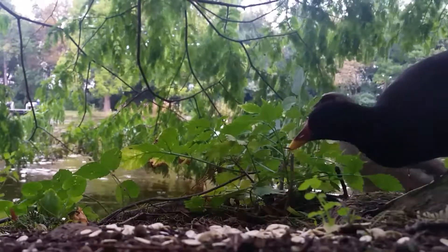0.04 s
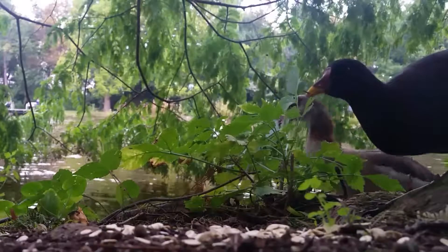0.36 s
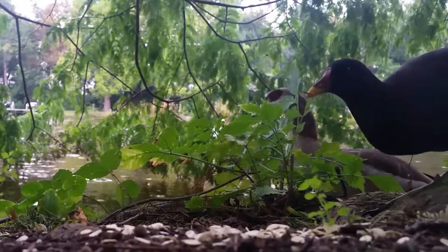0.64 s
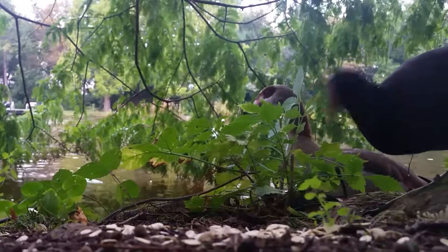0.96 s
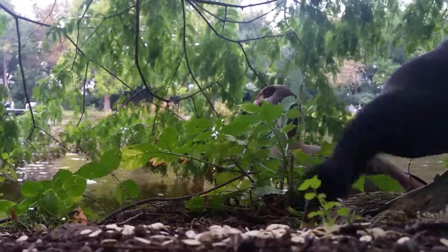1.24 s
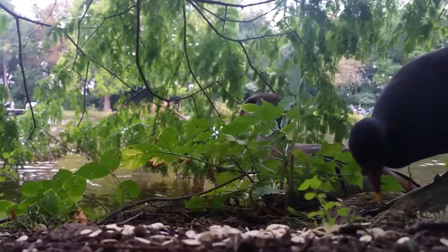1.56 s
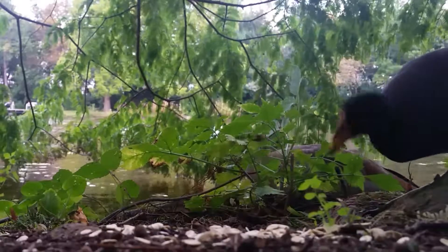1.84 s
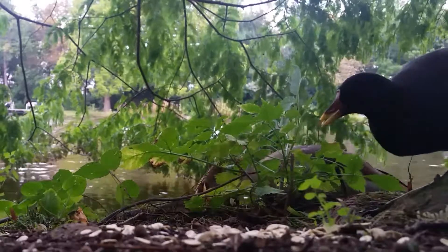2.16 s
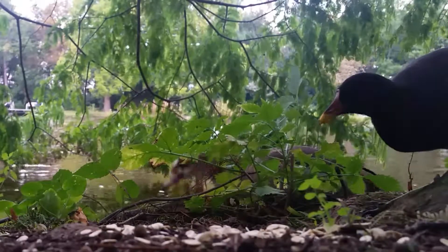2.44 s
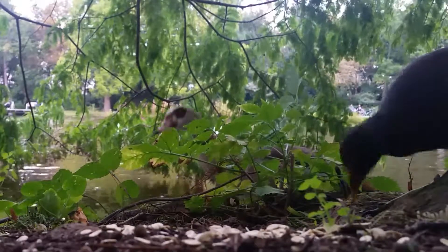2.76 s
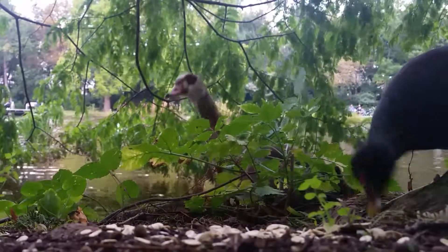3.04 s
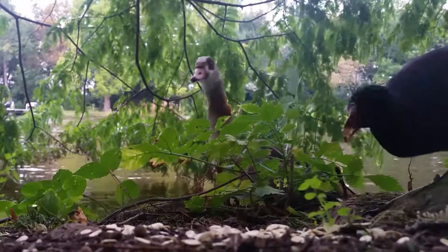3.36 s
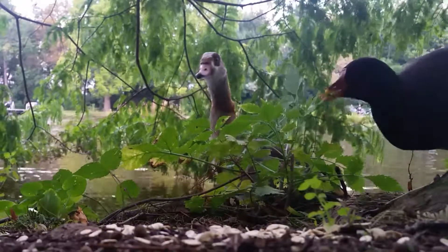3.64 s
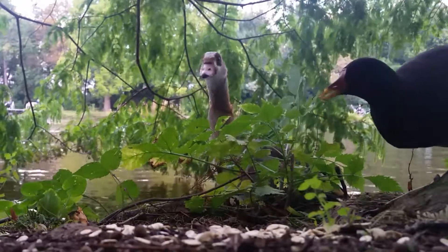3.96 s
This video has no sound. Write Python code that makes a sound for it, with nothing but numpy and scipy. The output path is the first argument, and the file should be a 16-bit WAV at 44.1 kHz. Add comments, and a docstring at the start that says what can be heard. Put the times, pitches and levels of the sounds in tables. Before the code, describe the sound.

A dull rumble of far-off traffic swells slightly, under thin hiss and faint bird chirps.

```python
"""Distant traffic across a park pond

Many far vehicles merge into a dull roar that swells a little, with one engine droning under it.
The roar reaches the left microphone first, and its treble is diffuse. A thin high hiss hangs on
the left, and a small bird chips faintly on the right, its whistles scattered by the trees."""
import sys
import numpy as np
from scipy import signal
from scipy.fft import rfft, irfft
from scipy.io import wavfile

SR = 44100
rng = np.random.default_rng(int(sys.argv[2]) if len(sys.argv) > 2 else 0)


def unload_audio(sound):
    """Save the sound as a 16-bit wav file, at the path given as the first command line argument."""
    columns = np.transpose(np.atleast_2d(sound))
    # keep every value between -1 and 1, then stretch to whole-number steps
    steps = np.round(np.clip(columns, -1, 1) * 32767)
    wavfile.write(sys.argv[1], SR, steps.astype(np.int16))


N = 176400


def undb(db):
    """Amplitude ratio of a level in decibels."""
    return 10 ** (np.asarray(db) / 20)


def over_time(rows):
    """Linear interpolation of (time_s, value) rows at every sample."""
    return np.interp(np.arange(N) / SR, *np.array(rows).T)


def bin_hz():
    """Frequency of every Fourier bin, at least 1 Hz so that its logarithm is finite."""
    return np.maximum(np.fft.rfftfreq(N, 1 / SR), 1)


def over_frequency(rows):
    """Interpolation of (frequency_hz, value, ...) rows at every bin, on a logarithmic axis."""
    hz, *columns = np.array(rows).T
    return np.squeeze([np.interp(np.log(bin_hz()), np.log(hz), column) for column in columns])


def white_spectrum():
    """Spectrum of fresh white noise: equal mean power at all frequencies."""
    return rfft(rng.standard_normal(N))


def wander(bandwidth_hz):
    """Low-pass noise: a smooth random fluctuation of zero mean and unit variance."""
    low_pass = np.exp(-(np.fft.rfftfreq(N, 1 / SR) / bandwidth_hz) ** 2)
    curve = irfft(white_spectrum() * low_pass, N)
    return (curve - curve.mean()) / curve.std()


def traffic_roar():
    """Superposition: many far vehicles sum to noise, partly coherent between the two microphones."""
    # spectrum on the left: frequency_hz, relative_density_db
    roar_shape = [(20, -23), (44, -8), (70, -4.5), (120, -2), (200, -3.5), (235, -5.5), (264, -10.5),
                  (295, -4), (378, 0.06), (520, -6.5), (610, -5), (780, -7.5), (890, -10.5), (1030, -8),
                  (1550, -20.5), (2200, -22.5), (2550, -30), (2900, -40.5), (4100, -43), (4900, -66.5),
                  (5600, -73.5), (6200, -100)]
    # share of the power common to both sides: frequency_hz, fraction
    common_power = [(20, .78), (60, .99), (210, .975), (262, .75), (300, .975), (400, .98), (540, .89),
                    (1150, .93), (1700, .62), (2000, .58), (2270, .8), (2750, .4), (3400, .52), (4300, .05)]
    # level of the left above the right: frequency_hz, balance_db
    balance = [(60, -1.5), (220, -1), (300, 4), (400, 2), (520, -1.5), (610, 2.7), (880, -1), (1050, 5.5),
               (1500, 7.5), (1750, 12.5), (2050, 11), (2400, 5), (2900, -1), (4100, 2), (4900, -16),
               (6500, -20)]
    # phase by which the left leads: frequency_hz, lead_rad
    phase_lead = [(20, 0), (100, .12), (200, .3), (320, .7), (480, .8), (590, 1.55), (770, 1.6),
                  (910, 2.55), (1100, 2.5), (1550, 3.5), (2150, 2.8), (2650, 3.8), (3200, 6.1), (4100, 8.6)]
    # brief swells of the roar: peak_s, length_s, centre_hz, rise_db
    surges = [(.215, .17, 500, 4.5), (.49, .14, 440, 5.2), (.56, .1, 850, 2.8), (.77, .06, 1100, 3),
              (1.03, .05, 560, 3.5), (1.5, .1, 1200, 2.3), (1.64, .14, 430, 3.5), (1.78, .03, 520, 5.5),
              (2.02, .06, 380, 3.5), (2.15, .14, 480, 3.3), (2.54, .05, 370, 4), (2.6, .04, 650, 3.5),
              (2.82, .065, 340, 6), (3.11, .11, 390, 6.5), (3.35, .05, 360, 4.3), (3.53, .06, 560, 4.6),
              (3.73, .13, 340, 6.3)]
    share = np.clip(over_frequency(common_power), 0, 1)
    coherent = np.sqrt(share) * white_spectrum()
    diffuse = np.sqrt(1 - share) * np.array([white_spectrum(), white_spectrum()])
    spectra = (coherent + diffuse) * undb(over_frequency(roar_shape))
    spectra[1] *= undb(-over_frequency(balance)) * np.exp(-1j * over_frequency(phase_lead))
    spectra *= undb(-34.5) / irfft(spectra[0], N).std()

    # Half-octave bands drift together, flicker separately and rise with surges near them in frequency.
    t, bin_octaves = np.arange(N) / SR, np.log2(bin_hz())
    drift_db = 0.72 * wander(bandwidth_hz=0.45)
    surge_db = np.array([db * np.exp(-(2 * (t - peak) / length) ** 2) for peak, length, _, db in surges])
    surge_octaves, spread_octaves = np.log2([hz for _, _, hz, _ in surges]), 0.5
    roar = 0
    for octave in np.arange(4, 13.5, 0.5):
        band = irfft(spectra * np.maximum(1 - 2 * abs(bin_octaves - octave), 0), N)
        surge_weights = np.exp(-((octave - surge_octaves) / spread_octaves) ** 2 / 2)
        flicker_db = 0.84 * wander(bandwidth_hz=23.1)
        roar = roar + band * undb(drift_db + surge_weights @ surge_db + flicker_db)
    return roar


def engine_drone():
    """Periodic firing: only the fundamental of one far engine carries, wavering on its way."""
    # slow envelope of the drone: time_s, relative_level_db
    envelope = [(0, -49.5), (0.3, -54), (0.9, -37), (1.3, -56), (1.7, -43), (2, -45), (2.3, -43.5),
                (2.7, -40), (3, -45), (3.3, -46), (4, -41)]
    firing_hz, gain_db = 70.14, -2.5
    pitch_hz = firing_hz * (1 + 0.02 * wander(bandwidth_hz=5.2))
    flutter_db = 3 * wander(bandwidth_hz=6.4)
    tone = np.sqrt(2) * np.sin(2 * np.pi * np.cumsum(pitch_hz) / SR)
    return tone * undb(over_time(envelope) + gain_db + flutter_db)


def high_hiss():
    """Band-limited noise, incoherent between left and right, with a slight flicker in level."""
    # spectrum of the hiss: frequency_hz, left_relative_density_db, right_relative_density_db
    hiss_shape = [(7800, -53, -64.5), (8390, -19.5, -46), (8900, -11.5, -39), (9680, 1, -32.5),
                  (10230, 3, -27), (10900, -1.5, -18), (11400, 2.5, -18), (12700, -3, -12.5),
                  (14300, -9, -14.5), (14900, -24, -21.5), (15600, -33.5, -27)]
    # slow envelope of the hiss: time_s, relative_level_db
    envelope = [(0, -65.5), (0.5, -63), (1, -66), (1.6, -68), (2.2, -68), (2.7, -66), (3.1, -68),
                (3.45, -68.0), (4, -64.5)]
    gain_db = 6
    spectra = np.array([white_spectrum(), white_spectrum()]) * undb(over_frequency(hiss_shape))
    hiss = irfft(spectra, N)
    flicker_db = 0.53 * wander(bandwidth_hz=14)
    return hiss / hiss[0].std() * undb(over_time(envelope) + gain_db + flicker_db)


def bird_chips():
    """Frequency-modulated whistles from the right; scattering in the trees adds a reverberant tail."""
    # direct whistles on the right: start_s, length_s, first_hz, last_hz, level_db
    chips = [(1.195, 0.04, 6100, 5700, -82.5), (1.71, 0.048, 6000, 5800, -85.5),
             (2.305, 0.088, 5300, 3330, -67.5), (2.335, 0.06, 6200, 5350, -77.5),
             (2.436, 0.038, 3950, 4120, -72.5)]
    left_db, scatter_db, scatter_t60_s = -10, -3, 0.23
    t, whistles = np.arange(N) / SR, 0
    tremble = 1 + 0.007 * wander(bandwidth_hz=180)
    for start_s, length_s, first_hz, last_hz, level_db in chips:
        progress = np.clip((t - start_s) / length_s, 0, 1)
        pitch_hz = last_hz + (first_hz - last_hz) * (1 - progress) ** 1.9  # glides fast, then levels out
        tone = np.sin(2 * np.pi * np.cumsum(pitch_hz * tremble) / SR)
        whistles = whistles + undb(level_db) * np.sin(np.pi * progress) * tone
    tail = rng.standard_normal((2, N)) * np.exp(-np.log(1000) * t / scatter_t60_s)
    scattered = signal.fftconvolve(whistles[None], tail / np.linalg.norm(tail[0]))[:, :N]
    return (whistles + undb(scatter_db) * scattered) * np.array([[undb(left_db)], [1]])


def scene():
    """Linear superposition: the pressures of all sources add at the pond's edge."""
    return traffic_roar() + engine_drone() + high_hiss() + bird_chips()


def record(dry):
    """Band limiting: the recorder's steep low-pass filter removes the highest treble."""
    cutoff_hz = 15600
    low_pass = signal.ellip(8, 0.2, 70, cutoff_hz, fs=SR, output="sos")
    return signal.sosfilt(low_pass, dry)


dry = scene()
out = record(dry)
unload_audio(out)
```